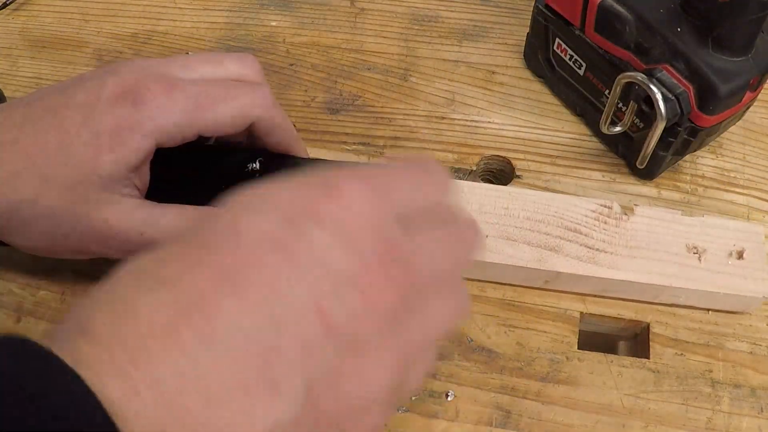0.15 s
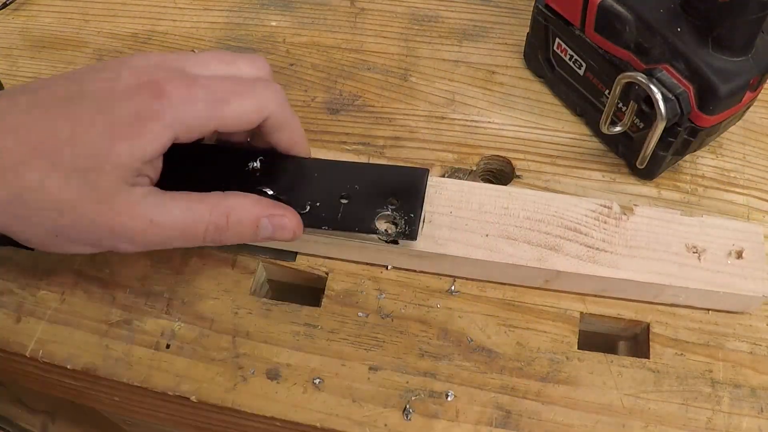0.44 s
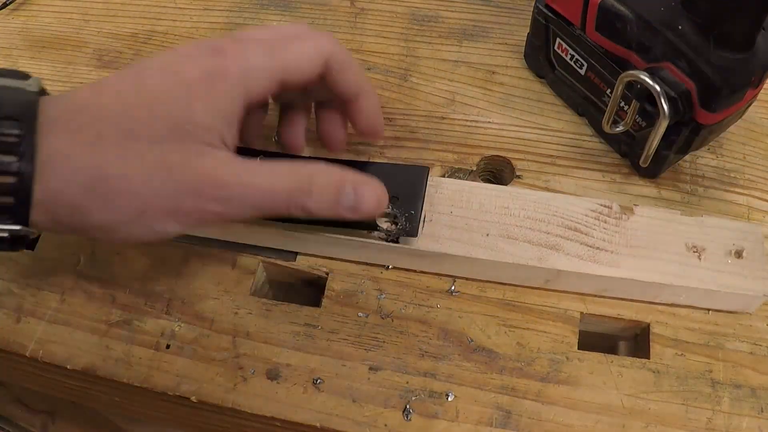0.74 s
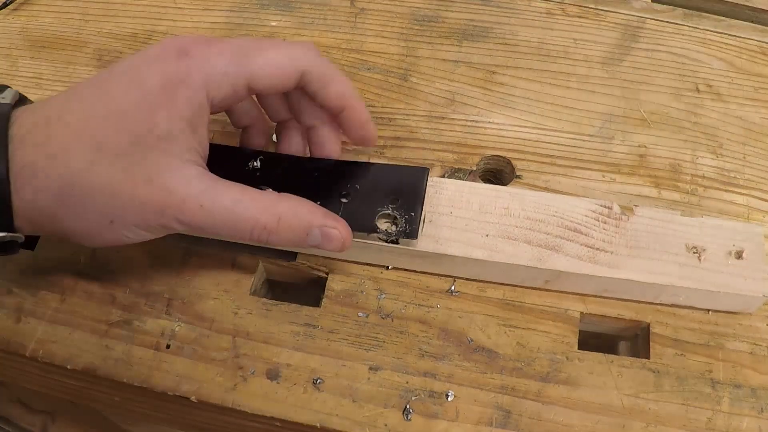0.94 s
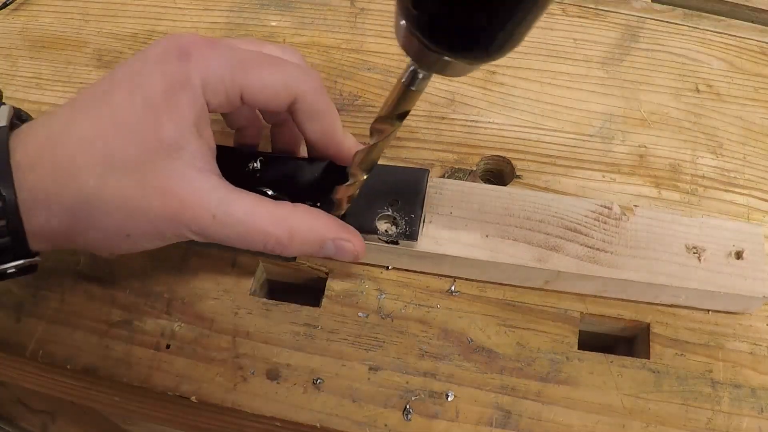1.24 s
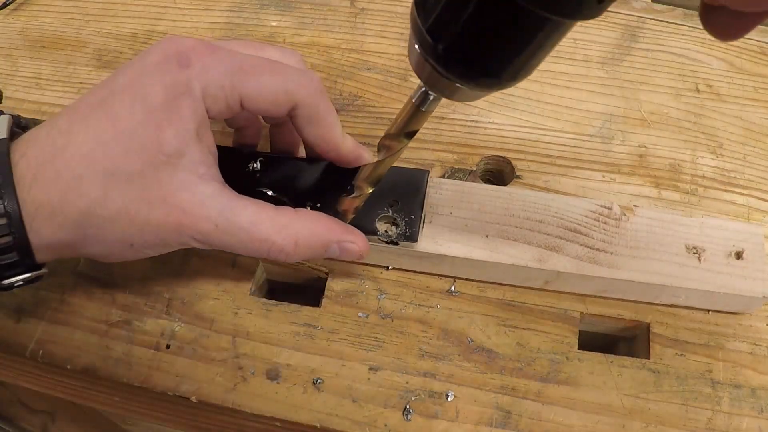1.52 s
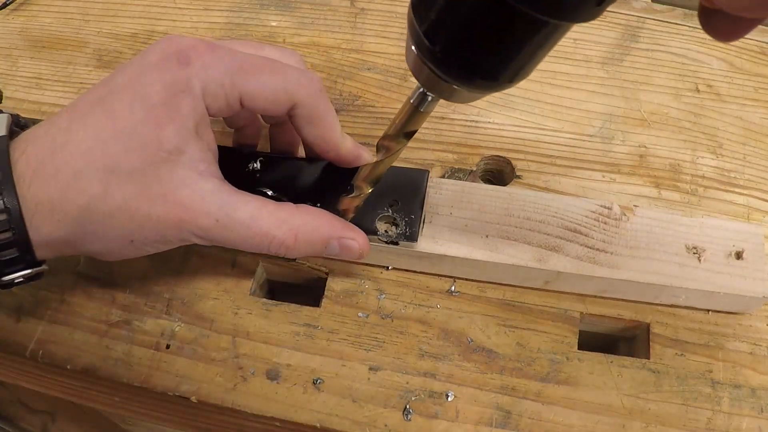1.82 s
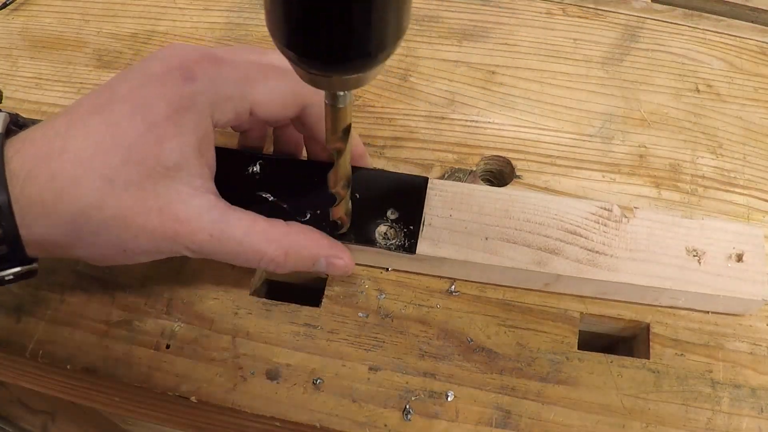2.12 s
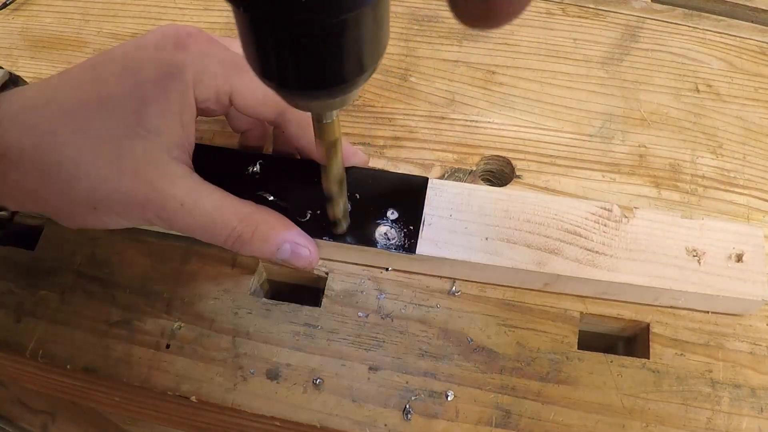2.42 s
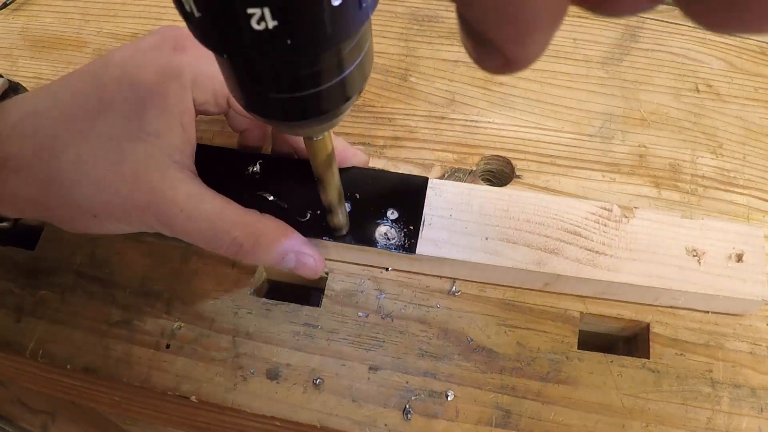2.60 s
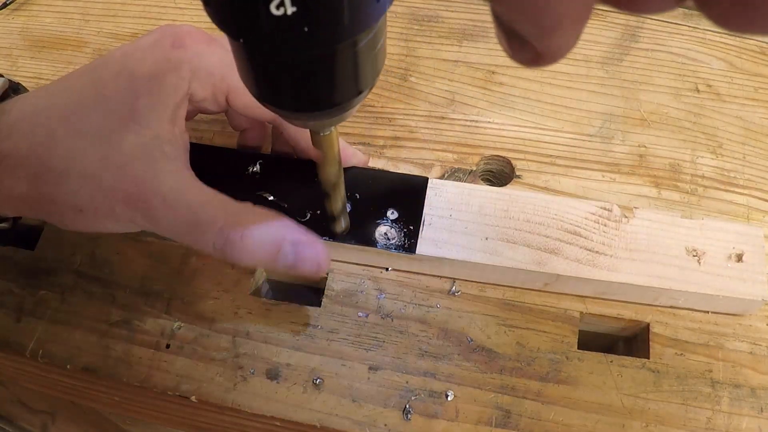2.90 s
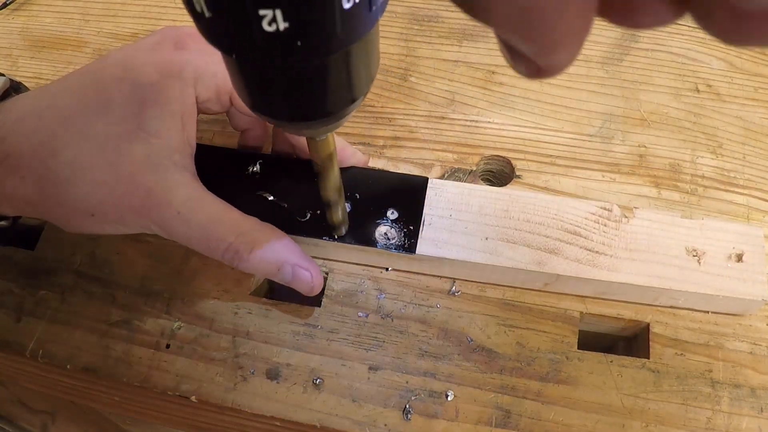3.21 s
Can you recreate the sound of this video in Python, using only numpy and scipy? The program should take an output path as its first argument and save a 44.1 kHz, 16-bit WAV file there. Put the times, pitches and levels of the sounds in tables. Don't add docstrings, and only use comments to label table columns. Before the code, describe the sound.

Cordless drill spins up abruptly to a steady high whine on metal, preceded by ticks and scrapes.

```python
import sys
import numpy as np
from scipy import signal
from scipy.fft import rfft, irfft
from scipy.io import wavfile
from scipy.ndimage import uniform_filter1d

SR = 44100
rng = np.random.default_rng(int(sys.argv[2]) if len(sys.argv) > 2 else 0)


def unload_audio(sound):
    columns = np.transpose(np.atleast_2d(sound))
    steps = np.round(np.clip(columns, -1, 1) * 32767)
    wavfile.write(sys.argv[1], SR, steps.astype(np.int16))


def elevation(decibels):
    levels = np.asarray(decibels, float)
    return 10 ** (levels / 20)


N = 147735
T = np.arange(N) / SR
F = np.maximum(np.arange(N // 2 + 1) * SR / N, 1)

# frequency in Hz, density in dB per Hz.
AIR_COLOUR = [(30, -32), (80, -23.5), (165, -3.5), (500, -10), (1200, -13.5), (3300, -29), (9000, -29),
              (14000, -42.5)]
# frequency in Hz, level in dB.
LAMP_HUM = [(239, -73.5), (356, -83), (477, -76.5)]
AIR_DB = -63
REPEAT_S, REPEAT_SHARE = 2048 / 48000, 0.44

# start in seconds, length in seconds, level in dB, centre in Hz.
RUSTLES = [
    (0.542, 0.18, -67.5, 5000),
    (0.7, 0.38, -68.5, 4800),
    (1.047, 0.12, -73, 6000),
    (1.327, 0.078, -72, 4970),
    (2.109, 0.055, -74, 4500),
    (2.153, 0.22, -63, 4960),
]

# time in seconds, level in dB, low edge in Hz, strongest ring in Hz,
# left minus right in dB.
TICKS = [(0.037, -63.5, 3000, 5500, 2), (0.184, -50, 1670, 4700, 2.5), (0.216, -54, 2500, 3580, 1),
         (.754, -43, 2300, 4000, 1.5), (0.88, -57, 2200, 7450, -3), (.908, -38, 2000, 5750, 0.5),
         (.909, -68, 9000, 14800, -5), (0.999, -55.5, 1800, 5530, 8), (1.015, -37, 4400, 5300, -3),
         (1.032, -70, 2200, 7000, 11), (2.051, -58.5, 450, 930, 3), (2.187, -62, 2970, 7500, 7),
         (2.26, -55, 3480, 6400, -1), (2.392, -51, 1490, 5450, 6)]
# frequency in Hz, width in Hz, gain in dB.
STRIP_RINGS = [(2500, 3500, 8.5), (3200, 830, 2.5), (4430, 240, -1), (4700, 500, 3), (5880, 300, 6),
               (7000, 610, 7.5)]
TICK_RISE_S, TICK_FALL_S, TICK_TOP_HZ = 0.0036, 0.0052, 7500
RING_WIDTH_SHARE, RING_DB = 0.12, 10

# time in seconds, level in dB, brightness in Hz, left minus right in dB.
KNOCKS = [
    (0.639, -64.5, 404, -4),
    (1.014, -68.5, 1500, -5),
    (2.049, -76, 1750, -8),
]
# time in seconds, level in dB.
DRAG = [
    (.73, -69),
    (.75, -55),
    (.785, -59),
    (.81, -42.5),
    (.86, -48),
    (.895, -58),
    (.915, -57.5),
    (.945, -52.5),
    (.963, -85),
]
# frequency in Hz, level in dB, 60 dB decay in seconds.
BENCH_MODES = [(155, -11, 0.039), (214, -3, 0.075), (359, 1, 0.052), (471, 1, 0.051), (564, -4.5, 0.049),
               (642, -2.5, 0.079), (1550, -2.5, 0.039), (1760, -4, 0.024), (2120, -34, 0.015)]
# frequency in Hz, width in Hz, gain in dB.
BENCH_DIP = [(980, 280, -1.5), (170, 110, 1)]
SLIP_RATE_HZ, SLIP_SCATTER_DB, DRAG_PAN_DB, DRAG_TOP_HZ = 900, 4.5, 3.5, 2200
LOW_CUT_HZ = 81

# time in seconds, frequency in Hz, peak in dB, length in seconds,
# left minus right in dB.
PALM_THUD = [
    (.5657, 213, -31, 0.004, 2),
    (.569, 418, -45, 0.006, 4),
    (.5795, 248, -41, 0.0031, -3),
    (.597, 219, -52.5, 0.008, 10),
]
FOOT_BUMPS = [(.752, 363, -51, 0.0065, 3), (.755, 1930, -54, 0.0044, 2), (.8, 643, -50.5, 0.01, 6),
              (0.8156, 538, -37, 0.0038, 8), (.817, 232, -42, 0.0063, 7), (.818, 1720, -45, 0.0031, -6),
              (.845, 480, -38, 0.0043, 8.5), (.848, 224, -39.5, 0.0068, 11), (.86, 1760, -54, .006, -5),
              (.892, 376, -47.5, 0.0073, 8.5), (.9085, 1697, -37.5, 0.0026, 5),
              (0.91, 1240, -50, 0.0037, 3), (.937, 640, -51.5, 0.0096, 8), (.945, 1520, -56.5, 0.011, -2),
              (1.015, 5440, -34.5, 0.0021, -3), (1.0135, 1790, -44.5, 0.0034, -1),
              (1.015, 2460, -43.5, 0.0026, -3), (1.015, 3200, -56, 0.0022, 0), (1.016, 760, -54.5, .004, 0)]
TIP_TOUCHES = [(2.051, 850, -55, .004, 0), (2.052, 1100, -58, .004, 0), (2.051, 1600, -59, .004, 0),
               (2.051, 1900, -61, .004, 0), (2.387, 720, -54, .004, 6)]
NAIL_PINGS = [(.035, 3700, -64, .003, 2), (.041, 3930, -61, 0.0038, 2), (.184, 7500, -57, 0.005, 3),
              (.183, 12300, -65, .004, 0), (.219, 3270, -60, 0.0058, -2), (1.017, 1140, -53, .004, -3)]
GEAR_TAKE_UP = [(2.399, 2850, -38, .002, 3), (2.4065, 2880, -27.5, 0.0028, 2.5),
                (2.413, 3200, -30.5, 0.0038, 3), (2.42, 2880, -28.5, 0.0038, 3),
                (2.418, 5150, -31, 0.0025, 3), (2.429, 5450, -34, 0.0027, 3),
                (2.436, 5050, -26.5, 0.0027, 3), (2.41, 143, -48, 0.0084, 3)]
# time in seconds, frequency in Hz, peak in dB.
EDGE_CATCHES = [(2.407, 1160, -48), (2.418, 1180, -33.5), (2.44, 1080, -33), (2.46, 1070, -34.5),
                (2.493, 1200, -37), (2.552, 990, -44), (2.578, 890, -42), (2.606, 1140, -36),
                (2.655, 996, -42), (2.761, 900, -32.5), (2.8, 1290, -37), (2.844, 1160, -40),
                (2.91, 1110, -40), (3.053, 1190, -40), (3.196, 1080, -43), (3.239, 850, -38)]
CATCH_S, CATCH_PAN_DB, RING_LAG_RAD = 0.0031, 8.5, 1.3

# time in seconds, level in dB, left minus right in dB.
MESH_WHINE = [(2.42, -39, 0), (2.449, -42, 2), (2.459, -30, -1), (2.472, -35, 4), (2.5, -29, 4),
              (2.54, -32, -1), (2.57, -31, 5), (2.606, -37.5, 20), (2.68, -38.5, 17.5), (2.79, -33.5, 13.5),
              (2.85, -34.5, 12.5), (2.94, -36, 11), (2.972, -33, 12.5), (3.07, -36.5, 13.5),
              (3.144, -32, 9), (3.265, -35, 14), (3.3, -44, 7), (3.35, -41, -1)]
MESH_SLIPS = [2.709, 2.949, 3.087]
OVERTONE_GAPS = [2.51, 2.74]
ORDERS = [1, 4, 5, 8, 9.17, 16, 20, 26, 32]
# level in dB, left minus right in dB.
ORDER_LEVELS = [(-50.5, 4.5), (-65, 24), (-63.5, 16), (-58.5, -9), (-64, 5), (-61, -16), (-83, 2),
                (-66, -13.5), (-85, 0)]
# frequency in Hz, density in dB per Hz.
GRIND_COLOUR = [(60, -41.5), (160, -14), (480, -20.5), (1000, -6), (1700, -14.5), (3600, -9), (7000, -7.5),
                (10500, -39)]
# frequency in Hz, left minus right in dB.
GRIND_PAN = [(60, 16), (110, -0.5), (200, 9), (380, 12), (700, 12.5), (1290, 8), (2380, 2), (4400, 6.5),
             (8120, -5), (15000, 18)]
# frequency in Hz, width in Hz, gain in dB.
CASING = [(1250, 180, 2), (2350, 640, 4.5), (3650, 370, 3.5), (4450, 660, -2.5), (6400, 740, -0.5),
          (9330, 680, 7), (10730, 550, 6), (14000, 2000, -2.5)]
# frequency in Hz, width in Hz, gain in dB.
TOP_GAPS = [(12050, 330, -18), (12420, 100, -12)]
# frequency in Hz, width in Hz, level in dB.
START_RATTLE = [(2880, 500, -42), (3600, 900, -44), (10500, 5000, -54)]
START_S, ATTACK_S, RATTLE_S = 2.3965, 0.0095, 0.04
SHAFT_HZ, SPIN_UP_S, SPIN_FROM, LOCK_POWER, DRIFT = 439.72, 0.058, 0.7, 12, 0.0006
BITE_S, BITE_SAG_PER_S = 3.23, 0.082
TEETH, WHINE_GAIN_DB, WHINE_FLICKER_DB, FLICKER_HZ = 13, -3, 1.1, 30
SLIP_S, SLIP_DB, GAP_S, GAP_DB = 0.0033, -12, 0.014, -40
SWITCH_HZ, SWITCH_DB = 12570, -65
GRIND_DB, GRIND_FLICKER_DB, GRIND_SAG_DB_PER_S = -32.5, 1.33, -1

TOP_HZ = 14950
MASK_HZ, MASK_DB, MASK_TILT_DB_PER_OCT, MASK_DEPTH_DB = 9300, -23.5, -10, -40


def rms1(x):
    return x / np.sqrt(np.mean(x ** 2))


def shape(x, db):
    return irfft(rfft(x) * elevation(db), N)


def points(table):
    hz, db = np.array(table).T
    return np.interp(np.log(F), np.log(hz), db)


def resonances(table):
    return sum(db / (1 + ((F - hz) * 2 / width) ** 2) for hz, width, db in table)


def band(lo_hz, hi_hz):
    return -10 * np.log10((1 + (lo_hz / F) ** 6) * (1 + (F / hi_hz) ** 10))


def noise(db, repeat=0.):
    comb = 1 / (1 - min(repeat, .9) * np.exp(-2j * np.pi * F * REPEAT_S))
    white = rfft(rng.standard_normal((2, N)))
    return rms1(irfft(white * comb * elevation(db), N))


def walk(rate_hz, channels=1):
    hz = np.arange(len(F)) * SR / N
    return rms1(shape(rng.standard_normal((channels, N)), -10 * np.log10(1 + (hz / rate_hz) ** 4)))


def pan(db):
    return elevation(np.array([db / 2, -db / 2])).reshape(2, -1)


def burst(t0, rise_s, fall_s):
    rise = ((t0 - T) / rise_s) ** 2 / 2
    fall = (np.abs(T - t0) / fall_s) ** 1.93
    return np.exp(-np.where(T < t0, rise, fall))


def shop():
    hum = 0
    for hz, db in LAMP_HUM:
        level = elevation(db + 3 * walk(5, channels=2))
        hum = hum + level * np.sin(2 * np.pi * hz * T + walk(3, channels=2))
    air = noise(points(AIR_COLOUR), REPEAT_SHARE)
    return elevation(AIR_DB + 0.3 * walk(12, channels=2)) * air + hum


def rustle():
    out = 0
    for start, length, db, hz in RUSTLES:
        arch = np.sqrt(np.maximum(1 - ((T - start) * 2 / length - 1) ** 2, 0))
        hiss = noise(band(0.35 * hz, 1.44 * hz), REPEAT_SHARE)
        out = out + elevation(db + 1.7 * walk(24)) * arch * hiss
    return out


def ticks():
    base = rfft(noise(resonances(STRIP_RINGS) - 10 * np.log10(1 + (F / TICK_TOP_HZ) ** 10)))
    out = 0
    for t, db, lo_hz, hz, pan_db in TICKS:
        colour = band(lo_hz, 30000) + resonances([(hz, RING_WIDTH_SHARE * hz, RING_DB)])
        ring = rms1(irfft(base * elevation(colour), N))
        out = out + elevation(db) * pan(pan_db) * burst(t, TICK_RISE_S, TICK_FALL_S) * ring
    return out


def drag_force():
    chance = rng.random((2, 2, N))
    strength = elevation(-SLIP_SCATTER_DB * np.log(chance[1] + 0.097))
    slip = (chance[0] < SLIP_RATE_HZ / SR) * strength * np.sqrt(SR / SLIP_RATE_HZ)
    level = elevation(np.interp(T, *np.array(DRAG).T, left=-200, right=-200))
    return 0.031 * shape(slip - slip.mean(), band(90, DRAG_TOP_HZ)) * level * pan(DRAG_PAN_DB)


def knock_force():
    grit = rng.standard_normal((2, N))
    push = 0
    for t, db, hz, pan_db in KNOCKS:
        blow = burst(t, 0.00022, 0.00054) * (1 + 1.5 * grit)
        push = push + 0.14 * elevation(db) * pan(pan_db) * shape(blow, band(85, hz))
    return push


def bench():
    turn, tau = rng.random((len(BENCH_MODES), 2, 1)), T[:SR // 4]
    body = 0
    for (hz, db, t60), u in zip(BENCH_MODES, turn):
        cycles = hz * tau * (1 + 0.19 * (u - .5)) + 0.55 * u
        body = body + elevation(db) * np.sin(2 * np.pi * cycles) * 1000 ** (-tau / t60)
    rung = signal.fftconvolve(drag_force() + knock_force(), body, axes=1)[:, :N]
    return shape(rung, band(LOW_CUT_HZ, 30000) + resonances(BENCH_DIP))


def rings():
    catches = [(*row, CATCH_S, CATCH_PAN_DB) for row in EDGE_CATCHES]
    lag = RING_LAG_RAD * np.array([[.5], [-.5]])
    out = 0
    for t, hz, db, length, pan_db in PALM_THUD + FOOT_BUMPS + TIP_TOUCHES + NAIL_PINGS + GEAR_TAKE_UP + catches:
        tone = np.cos(2 * np.pi * hz * (T - t) + lag)
        out = out + elevation(db) * pan(pan_db) * burst(t, 0.56 * length, 1.08 * length) * tone
    return out


def start_rattle(since):
    out = 0
    for hz, width, db in START_RATTLE:
        out = out + elevation(db) * noise(-20 * np.log10(1 + ((F - hz) * 2 / width) ** 2))
    return out * np.exp(-(since / RATTLE_S) ** 4)


def grind(since):
    colour = points(GRIND_COLOUR) + resonances(CASING + TOP_GAPS) + band(18, 20000)
    colour = colour + np.array([[.5], [-.5]]) * points(GRIND_PAN)
    raw, out = rfft(noise(colour, REPEAT_SHARE)), 0
    for hz in 125 * 2. ** np.arange(8):
        octaves = np.clip(np.log2(np.maximum(F, 125) / hz), -1, 1)
        share = np.cos(np.pi / 2 * octaves) ** 2
        out = out + irfft(raw * share, N) * elevation(GRIND_FLICKER_DB * walk(22))
    return elevation(GRIND_DB + GRIND_SAG_DB_PER_S * since) * out


def switch_tone():
    level = elevation(SWITCH_DB + 2.5 * walk(12))
    return level * np.sin(2 * np.pi * SWITCH_HZ * T + 0.48 * walk(6.7, channels=2))


def shaft_orders(turns):
    gaps = sum(GAP_DB * (np.abs(T - t) < GAP_S) for t in OVERTONE_GAPS)
    out = 0
    for k, (db, pan_db) in zip(ORDERS, ORDER_LEVELS):
        level = elevation(db + 0.77 * walk(24, channels=2) + gaps * (k == 2 * TEETH))
        tone = np.sin(2 * np.pi * k * turns + 0.26 * walk(8.1, channels=2))
        out = out + np.sqrt(2) * level * pan(pan_db) * tone
    return out


def mesh_whine(turns):
    t, db, pan_db = np.array(MESH_WHINE).T
    flicker = walk(FLICKER_HZ)[0]
    flicker = rms1(flicker - uniform_filter1d(flicker, size=5000))
    slips = sum(SLIP_DB * np.exp(-((T - s) / SLIP_S) ** 2 / 2) for s in MESH_SLIPS)
    level = elevation(np.interp(T, t, db) + WHINE_GAIN_DB + WHINE_FLICKER_DB * flicker + slips)
    tone = np.sin(2 * np.pi * TEETH * turns + .5 * walk(0.94, channels=2))
    return np.sqrt(2) * level * pan(np.interp(T, t, pan_db)) * tone


def drill():
    since = np.maximum(T - START_S, 0)
    spin = 1 - (1 - SPIN_FROM) * np.maximum(1 - since / SPIN_UP_S, 0) ** 2
    load = 1 - BITE_SAG_PER_S * np.maximum(T - BITE_S, 0) + DRIFT * walk(14.6)[0]
    turns = np.cumsum(SHAFT_HZ * spin * load) / SR
    tones = mesh_whine(turns) + shaft_orders(turns) + switch_tone()
    running = spin ** LOCK_POWER * tones + grind(since) + start_rattle(since)
    return running * np.clip(since / ATTACK_S, 0, 1) ** 2


def scene():
    return shop() + rustle() + ticks() + bench() + rings() + drill()


def top_cut(x):
    return signal.sosfilt(signal.butter(12, 15690, fs=SR, output="sos"), x)


def record(dry):
    f, _, z = signal.stft(dry, SR, nperseg=1536)
    power = np.abs(z) ** 2 + 1e-20
    middle = power[:, (f > 2000) & (f < 5000)].mean(axis=(0, 1))
    mask_db = MASK_DB + MASK_TILT_DB_PER_OCT * np.log2(np.maximum(f, 1) / MASK_HZ)
    smooth = uniform_filter1d(power.mean(axis=0), size=3, axis=0)
    under = smooth < middle * elevation(2 * mask_db)[:, None]
    drop_db = MASK_DEPTH_DB * (under & (f > MASK_HZ)[:, None])
    x = signal.istft(z * elevation(drop_db), SR, nperseg=1536)[1][:, :N]
    low_pass = signal.ellip(8, .2, 35, TOP_HZ, fs=SR, output="sos")
    return top_cut(signal.sosfilt(low_pass, x))


dry = scene()
out = record(dry)
unload_audio(out)
```